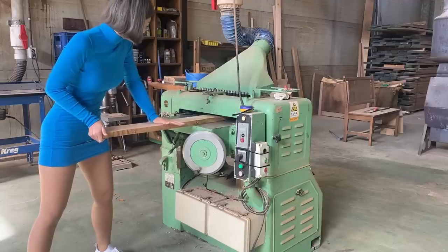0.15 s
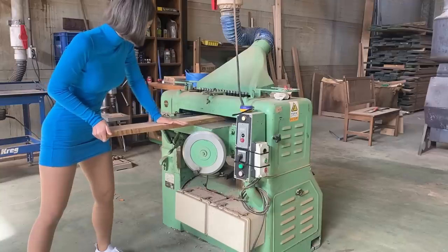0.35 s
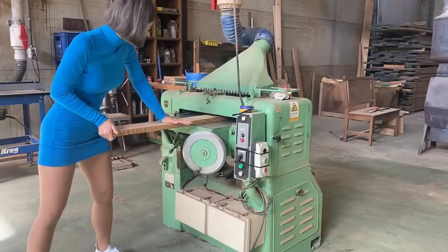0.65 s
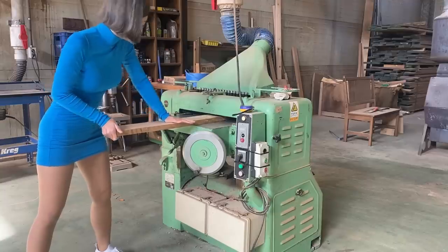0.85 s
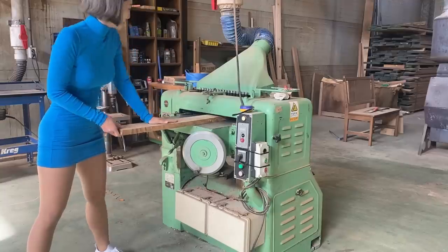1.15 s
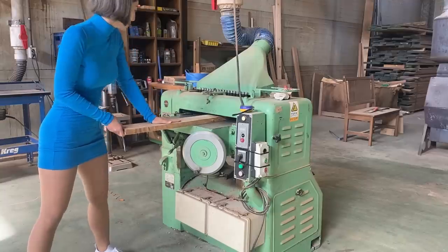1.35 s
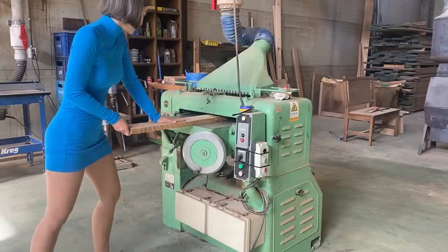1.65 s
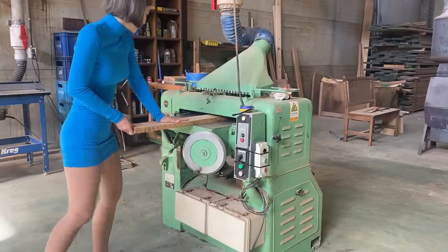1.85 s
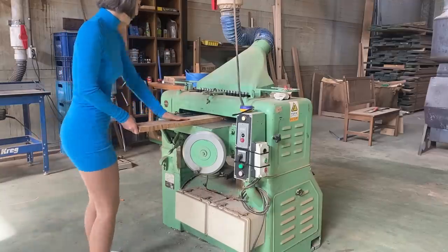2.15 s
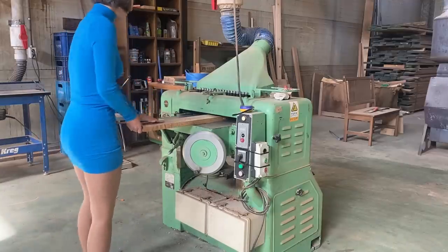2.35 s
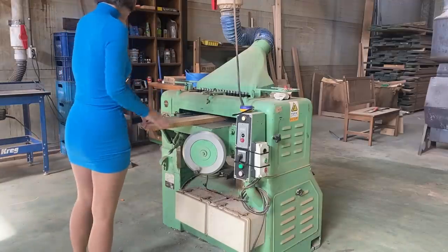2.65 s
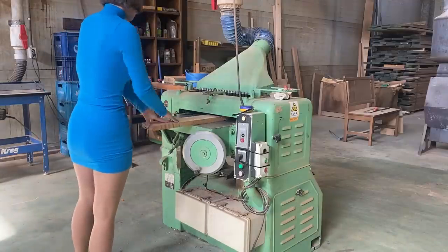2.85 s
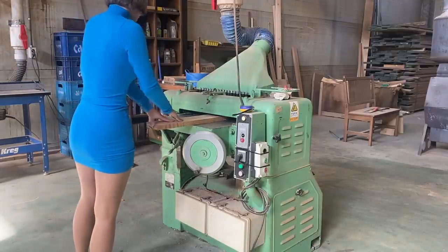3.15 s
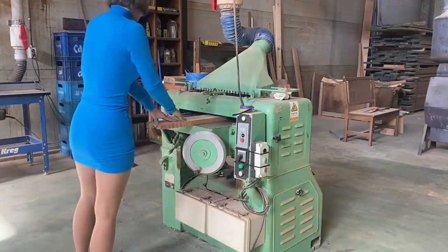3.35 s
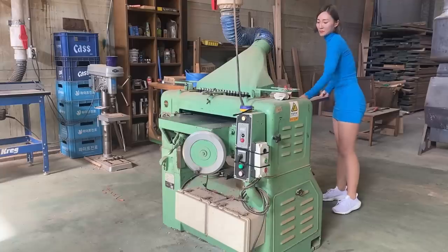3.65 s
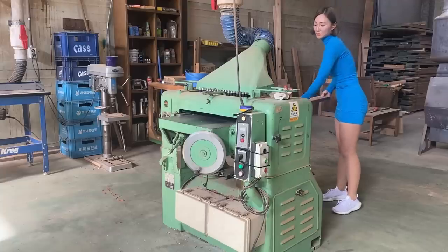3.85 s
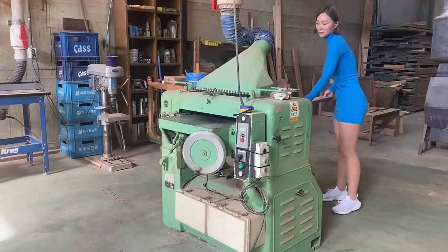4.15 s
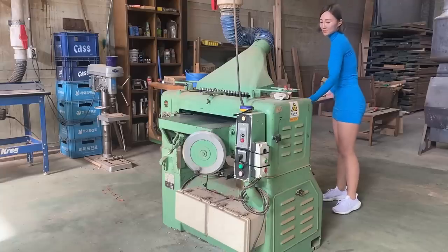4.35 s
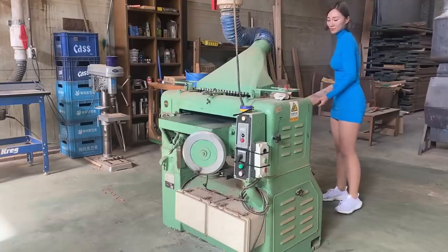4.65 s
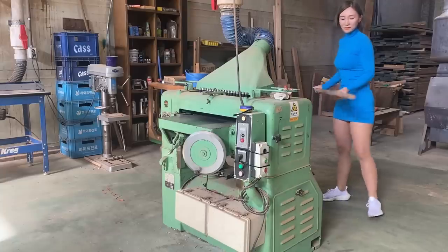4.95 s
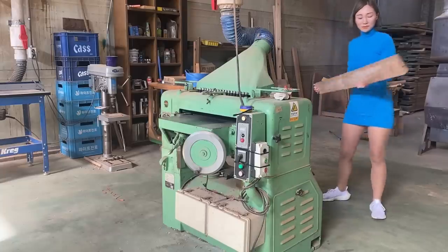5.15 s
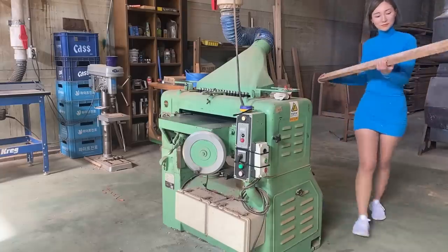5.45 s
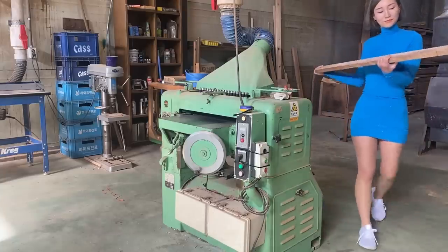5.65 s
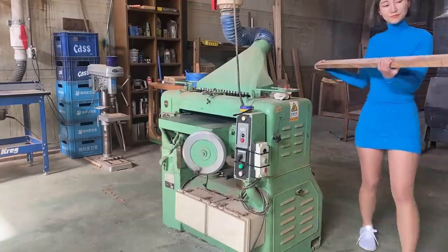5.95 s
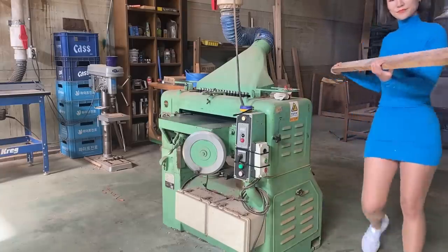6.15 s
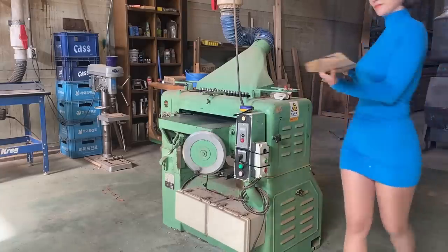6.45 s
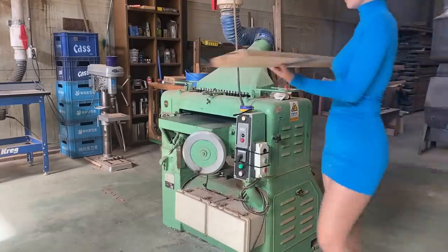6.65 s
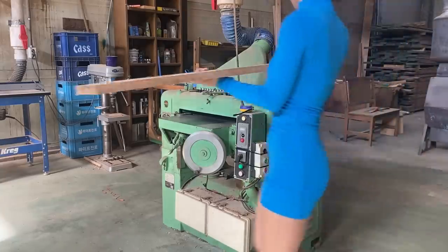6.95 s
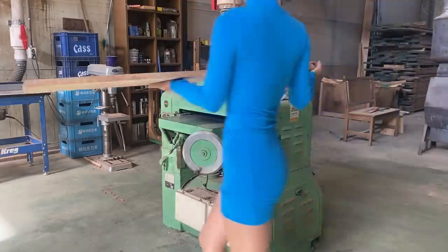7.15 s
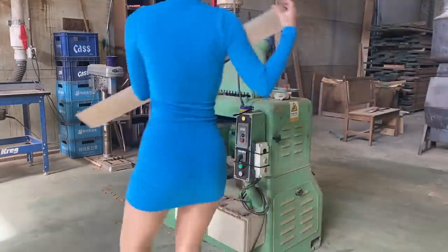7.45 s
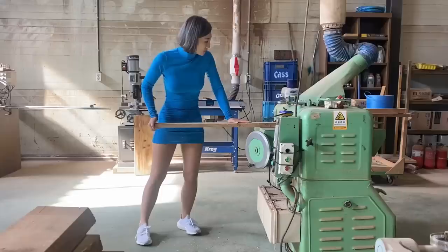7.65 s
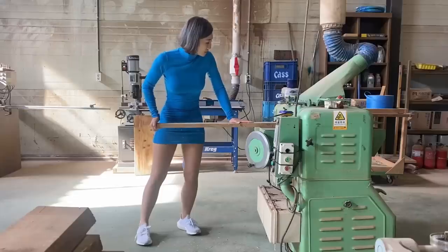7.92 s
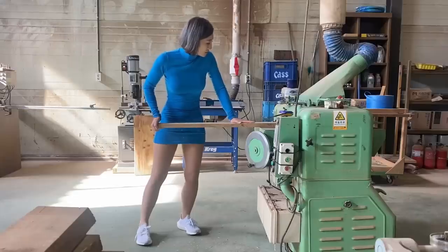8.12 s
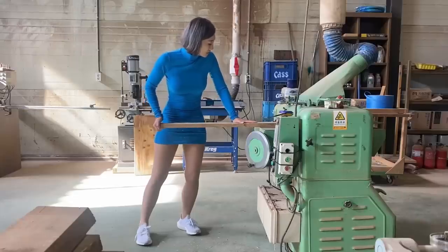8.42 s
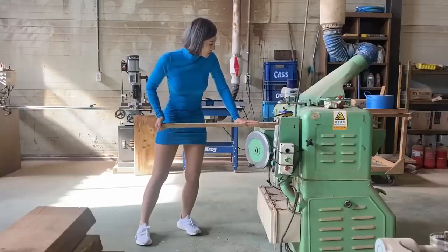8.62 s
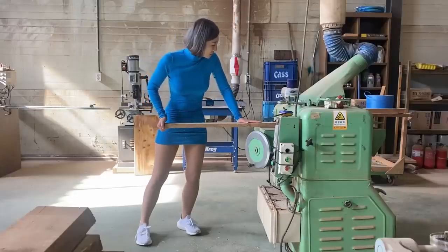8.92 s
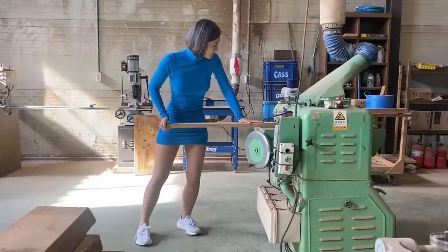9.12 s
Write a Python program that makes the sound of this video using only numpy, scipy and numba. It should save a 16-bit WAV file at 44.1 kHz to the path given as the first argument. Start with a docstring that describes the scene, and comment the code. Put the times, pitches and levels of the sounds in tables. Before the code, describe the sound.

From the start, a large planer is already cutting a board: a loud, steady, buzzing howl built on a low shaft pitch near 136 Hz, with a strong nasal whine and sizzling torn chips. Individual ringing tones swell and fade as the board slides, with rougher bursts around 0.1, 1 and 2.5 seconds; near 3 seconds the whine jumps louder and more piercing. At 3.4 it stops abruptly, leaving a far quieter idle: low hum, mid-low blower drone with slight beating, and dull rushing air. A faint wooden tick comes near 4.1, light shoe scuffs near 5.7, 5.9 and 7.4, while the drone gradually rises. At 7.6 a second pass bursts in, raspier, with more buzz and hiss, dipping around 8.3 to 8.5, then growing louder and more ringing until it ends mid-cut near 9.3. Stereo microphone, moderate distance, workshop.

```python
"""Thickness planer in a workshop

Three stretches follow abruptly: a board being planed, the machine idling with shoes scuffing, a second board pass.
Four uneven knives on a cutter shaft strike the ringing board, summed as multiples of the shaft rate.
Torn chips are noise in gusts once a turn; the empty cutter and a dust blower are steady tones, the blower's
just under the knife tone. Coloured noise gives the air roaring in the hood, the scuffs and a faint knock."""
import sys
import numpy as np
from scipy import signal
from scipy.fft import rfft, irfft
from scipy.io import wavfile
from scipy.ndimage import uniform_filter1d
from numba import njit

SR = 44100
rng = np.random.default_rng(int(sys.argv[2]) if len(sys.argv) > 2 else 0)


def volts_from_decibels(level):
    """Turn decibel levels (scalar or array-like) into linear amplitude factors."""
    exponent = np.asarray(level, float) / 20
    return 10 ** exponent


def log_audio(samples):
    """Write samples as a 16-bit WAV file to the path given in sys.argv[1]."""
    # one column per channel
    frames = np.atleast_2d(samples).T
    # limit to full scale, then quantise
    limited = np.clip(frames, -1, 1)
    pcm = np.round(limited * 32767).astype(np.int16)
    wavfile.write(sys.argv[1], SR, pcm)


N = 409248
HOP = 256  # samples per control step
T = np.arange(N // HOP + 2) * HOP / SR  # control times in seconds
ORDERS_N = 115  # multiples of the shaft rate
IDLE_HZ = 137.68  # shaft rate without a board
IDLE_HUM_DB = -62  # hum setting at which the empty cutter and the board's lowest multiples are not shifted

# The cut, one list for each pass of a board. Each row: time in seconds, shaft rate in Hz, whine (0.9-3.1 kHz) in dB,
# then in dB against the whine: buzz (3.1-6 kHz) and sizzle (over 6 kHz).
CUTS = [
    [(0.0, 136, -44.5, -6.5, -13), (0.17, 136.1, -42.5, -9, -18.5), (0.4, 136.2, -44, -7.5, -16),
     (0.56, 136, -40.5, -11.5, -18.5), (0.68, 136.1, -44.5, -10.5, -15), (0.94, 135.9, -41.5, -12, -18),
     (1.04, 136, -41, -8.5, -18), (1.12, 136, -45, -8.5, -16.5), (1.21, 136.1, -41, -10.5, -16.5),
     (1.34, 136.3, -45, -10.5, -17), (1.91, 135.9, -43.5, -13, -17), (2.74, 136.0, -45, -6.5, -15.5),
     (2.99, 135.9, -36, -11.5, -22.5), (3.08, 135.5, -37, -13, -22.5), (3.42, 135.5, -38, -13, -22)],
    [(7.621, 137.1, -53, -5, -11), (7.628, 136.4, -39, -3, -7.5), (7.794, 136.3, -38, -3.5, -10.5),
     (7.95, 136.2, -45, -3.5, -11), (8.098, 136.2, -42, -8.5, -11.5), (8.328, 136.1, -45, 1, -4.5),
     (8.374, 136.3, -44, -3, -11), (8.494, 136.3, -47, -1, -8), (8.656, 136.1, -41, -5.5, -12),
     (8.956, 136, -41, -6, -15.5), (9.132, 136.4, -39, -7, -18.5), (9.28, 135.9, -37.5, -7, -16)],
]
# Tones of the empty cutter. Each row: multiple of the shaft rate (its fraction is dropped), level in dB,
# left minus right in dB, lead of the left channel in radians.
EMPTY_TONES = [(1, -63.5, -0.5, -0.23), (2, -81, -8, 0.3), (3.0015, -71.5, 0, 0.2), (4.001, -63, 4.5, 0.1),
               (5.005, -74, -0.5, 0.4), (6, -79.5, -3, 1.7), (8.001, -66, 0.5, 0.96),
               (11.997, -77.5, -5.5, -0.4), (16.007, -75.5, 3, -0.2), (23.98, -87.5, 1.5, 0.2)]
# Centres of the four bands of chip hiss, in Hz.
CHIP_BANDS_HZ = [1200, 2800, 5000, 9000]
SECOND_PASS_S = CUTS[1][0][0]
EARLY = T < SECOND_PASS_S - 1  # first-pass settings hold until the idling is nearly over


def along(points, hz):
    """Read a (Hz, value) table on a log-frequency axis."""
    f, v = np.transpose(points)
    return np.interp(np.log(np.maximum(hz, 1)), np.log(f), v)


def full(curve):
    """Control rate to sample rate."""
    return np.interp(np.arange(N) / SR, T, curve)


def walks(rate, count):
    """Smooth random walks at control rate, spread 1; a higher rate (Hz) moves faster."""
    k = max(int(SR / HOP / rate), 1)
    w = uniform_filter1d(rng.standard_normal((count, len(T))), k)
    w = uniform_filter1d(w, k)
    return w / w.std()


def diffuse(points):
    """Coloured stereo noise, its mid at rms 1: alike left and right in the bass, opposed in the top treble."""
    # Each row: frequency in Hz, side minus mid in dB.
    side_points = [(60, -31), (110, -21), (200, -16), (380, -6), (700, -1), (1290, 6.5), (2380, -2),
                   (4400, -1), (8120, 0.5), (15000, 5)]
    hz = np.fft.rfftfreq(N, 1 / SR)
    mid, side = rfft(rng.standard_normal((2, N))) * volts_from_decibels(along(points, hz))
    side = side * volts_from_decibels(along(side_points, hz))
    mid, side = irfft(mid, N), irfft(side, N)
    return np.array([mid + side, mid - side]) / mid.std()


def stitch(tables, rest):
    """Columns of several stretches on one time line; rest between them."""
    out = np.full((len(tables[0][0]) - 1, len(T)), float(rest))
    for rows in tables:
        s, *columns = np.transpose(rows)
        inside = (T >= s[0]) & (T <= s[-1] + .004)
        out[:, inside] = [np.interp(T[inside], s, c) for c in columns]
    return out


def pair(db, pan_db, lead):
    """Complex peak sizes left and right of a tone of rms db."""
    left = volts_from_decibels(db + pan_db / 2) * np.exp(.5j * lead)
    right = volts_from_decibels(db - pan_db / 2) * np.exp(-.5j * lead)
    return np.sqrt(2) * np.array([left, right])


def ports(hz):
    """How two microphone ports hear the cutter: left lead (rad), balance (dB), share scattered by the hall."""
    # Each row: frequency in Hz, lead of the left port in radians, left minus right in dB.
    port_points = [(2400, 0.29, 2), (3520, 1.19, 2.5), (7500, 1.35, 5), (8600, 0.9, 3.5), (10550, -1., 1.5),
                   (12470, -3, 0), (13400, -3, 0), (14400, -5, 0), (15600, -6.5, 0)]
    f, lead, pan_db = np.transpose(port_points)
    scattered = np.exp(-(hz / 11100) ** 8)  # above 11.1 kHz the sound comes straight from the cutter
    return np.interp(hz, f, lead), np.interp(hz, f, pan_db), scattered


@njit
def sum_multiples(phase, size, heard, hop):
    """Sum the heard multiples of a shaft phase, each with a slowly moving complex size for both channels."""
    out = np.zeros((2, len(phase)))
    for i in range(len(phase)):
        b, u = i // hop, (i % hop) / hop
        z = np.exp(1j * phase[i])
        zk, left, right = z, 0., 0.
        for k in range(heard[b]):
            left += (zk * (size[0, b, k] + u * (size[0, b + 1, k] - size[0, b, k]))).real
            right += (zk * (size[1, b, k] + u * (size[1, b + 1, k] - size[1, b, k]))).real
            zk *= z
        out[0, i], out[1, i] = left, right
    return out


def board(bands_db, hum_db, cutting):
    """Uneven knives strike the ringing board: complex size of every shaft multiple, fading as the board slides."""
    # Ring of the board. Each row: multiple of the shaft rate, then for each pass a level in dB and left minus right
    # in dB. From the 7th multiple up the levels only balance the multiples within a band; the 1st is lowered below.
    ring_rows = [(2, -68.5, 1, -71.5, 1.5), (3, -64, 2.5, -64.5, 1.5), (4, -55.5, 1, -61.5, 0.5),
                 (5, -70.5, 1, -63, 2), (6, -71, 1, -76.5, 3), (7, -75.5, 3, -65, 0),
                 (8, -57.5, -1.5, -56, 2), (9, -63, -0.5, -57.5, -4), (10, -65, 0.5, -62, 9.5),
                 (11, -64.5, 4, -62.5, 2), (12, -49, 2, -54, 5.5), (13, -50, -1, -63, 7),
                 (14, -74.5, -4, -59.5, -5), (15, -65.5, 3, -59, -6), (16, -53, 1, -57.5, -4),
                 (17, -56.5, 3.5, -51, 1), (18, -64, 0, -59, 4), (19, -62.5, 3, -61, 7.5),
                 (20, -68, 6, -57.5, -1), (21, -57.5, 0, -60, -2), (22, -65, 1, -58, 1),
                 (23, -67.5, 1, -61, 5), (24, -63, 1, -57, 1), (25, -60.5, 2, -62, 1),
                 (26, -62.5, 1, -59, 1), (27, -69, 1, -59.5, 0.5), (28, -68.5, -1, -59, 3),
                 (29, -63.5, 2, -61, 2), (30, -66.5, 2, -69, 1), (31, -64.5, 0, -65.5, 1),
                 (32, -62, 1, -60, 1), (33, -63, 1, -60.5, 1)]
    # Ring above those multiples. Each row: frequency in Hz, level in dB against the last six of them.
    ring_top = [(3800, 3), (4500, -2.5), (6000, -6.5), (8000, -12), (10500, -19), (12500, -17.5),
                (14500, -19), (15500, -25)]
    # Relative depth of bite of each knife.
    knife_depths = [1, 0.81, 0.31, 0.39]
    # As the free end of the board shortens, resonances sing out or fall away. Each row: start and end in seconds,
    # centre in Hz, width in Hz, gain in dB before band balancing (part or none if the end precedes the start).
    singing = [(0, 1.05, 2180, 71, 5), (0, .45, 3300, 74, 7), (.6, 1.78, 1630, 58, 3),
               (-0.5, .75, 2680, 91, 9.5), (0.3, 2.07, 1360, 44, 8), (2.5, 3.2, 1900, 44, 9.5),
               (3, 3., 2860, 50, 6.5), (.9, 1.05, 1500, 43, 10.5), (1.1, 1.074, 3200, 430, 6.5),
               (1.2, 1.31, 1500, 50, 9), (1.3, 1.84, 2000, 72, -9), (1.6, 2.4, 3300, 140, -5),
               (1.6, 2.35, 2860, 69, 4), (2., 3.42, 747, 84, 10), (2, 3.42, 1220, 69, 9),
               (2, 2.75, 2700, 63, 8), (2.5, 2.8, 1770, 50, -4), (2.58, 2.82, 2180, 60, -10),
               (2.5, 2.7, 3520, 80, 4.5), (3, 3., 3400, 51, 9), (3, 3.33, 1500, 65, 9.5),
               (2.8, 3.42, 2040, 50, 11.5), (3.5, 3.08, 2310, 67, 4.5), (3, 3.42, 950, 53, 13.5),
               (3, 3.354, 2180, 60, 9), (3, 3.42, 1090, 43, 4.5), (3, 3.27, 2310, 50, -10),
               (2.97, 3.42, 2680, 90, 19), (3, 3.42, 3130, 50, 8), (7.62, 7.76, 2900, 95, 13.5),
               (7.62, 7.92, 1690, 80, 8), (7.62, 8.02, 3730, 150, 7.5), (8, 7.88, 2310, 60, 6),
               (7.5, 7.9, 3270, 60, 5.5), (8., 8.55, 950, 46, 8), (8.55, 9., 1415, 80, 8.5),
               (8., 8.32, 1900, 50, 6.5), (8.5, 8.36, 3700, 80, 9.5), (8.2, 8.5, 4490, 60, 5),
               (7.95, 8.35, 2580, 50, 7), (8.64, 9.28, 2180, 60, 15.5), (9, 9.28, 2310, 45, 6),
               (8.8, 9.28, 3270, 60, 5), (9.21, 9.28, 2860, 70, 13), (9, 9.28, 680, 46, 7.5),
               (9.15, 9.28, 1630, 60, 4.5)]
    # How far walls and casting scatter the phases, in radians, for each pass.
    scatter_rad = [1.17, 2.21]
    scatter_db, swell_db, sing_ramp_s = 2., 3., 0.077
    moving_db, apart, lead_spread = -6., 1.94, 0.79  # restless share, its left-right difference, lead in radians

    k = np.arange(1, ORDERS_N + 1)
    hz = k * IDLE_HZ
    port_lead, port_pan_db, diffuse_share = ports(hz)
    ring = np.transpose(ring_rows)
    db, pan_db, lead = np.zeros((3, len(T), ORDERS_N))

    # the knives come a quarter turn apart; the scattered phases creep as the board moves
    bites = sum(a * np.exp(-.5j * np.pi * k * j) for j, a in enumerate(knife_depths))
    phase = np.angle(bites) + np.where(EARLY, *scatter_rad)[:, None] * walks(.6, count=ORDERS_N).T

    for rows, low_db, pans in zip(CUTS, ring[1::2], ring[2::2]):
        shape = low_db[-6:].mean() + along(ring_top, hz) + scatter_db * rng.standard_normal(ORDERS_N)
        pan = port_pan_db + 2.2 * diffuse_share * rng.standard_normal(ORDERS_N)
        shape[1:len(low_db) + 1], pan[1:len(low_db) + 1] = low_db, pans
        shape[0] = low_db[0] - 30
        now = T >= rows[0][0] - .01
        db[now], pan_db[now] = shape, pan
        spread = lead_spread * diffuse_share * np.minimum(hz / 790.0, 1)
        lead[now] = port_lead + spread * rng.standard_normal(ORDERS_N)

    shaft_hz = CUTS[0][0][1]
    for start, end, mode_hz, width_hz, mode_db in singing:
        on = np.clip(np.minimum(T - start, end - T) / sing_ramp_s + 1, 0, 1)
        db += mode_db * np.outer(on, np.exp(-.5 * ((k * shaft_hz - mode_hz) / width_hz) ** 2))
    # upper multiples swell one by one
    db += swell_db * np.clip(hz / 2970.0 - .6, 0, 1) * walks(2.8, count=ORDERS_N).T
    # the lowest multiples shake the casting like the hum
    db[:, :6] += (hum_db - IDLE_HUM_DB)[:, None]
    # whine, buzz and sizzle bands are brought to their levels
    for (lo, hi), band_db in zip([(6, 23), (23, 44), (44, ORDERS_N)], bands_db):
        sum_db = 10 * np.log10((volts_from_decibels(db[:, lo:hi]) ** 2).sum(axis=1))
        db[:, lo:hi] += (band_db - sum_db)[:, None]

    # the sliding board shifts its nodes: a restless share, quicker in the treble, makes each multiple fade and turn
    slow, quick = (walks(rate, count=6 * ORDERS_N).reshape(3, 2, ORDERS_N, -1) for rate in (9., 24.))
    mix = np.clip(hz / 6700.0, 0, .9)[:, None]
    w = np.sqrt(1 - mix) * slow + np.sqrt(mix) * quick
    # neighbours move partly together, so the restless share still arrives as a rattle once a turn
    w = uniform_filter1d(w, size=3, axis=2) * np.sqrt(3)
    w = (w[:, 0] + 1j * w[:, 1]).transpose(0, 2, 1) * np.exp(1j * np.angle(bites)) / np.sqrt(2)
    own = apart * diffuse_share * np.minimum(hz / 3430.0, 1)
    # strong multiples are steadier than their weak neighbours
    restless_db = 0.72 * (uniform_filter1d(db, size=7, axis=1) - db) + moving_db
    share = volts_from_decibels(restless_db) * np.minimum(hz / 1130.0, 1)
    fade = (np.exp(1j * phase) + share * (w[0] + own * w[1:])) / np.sqrt(1 + share ** 2)
    return pair(db, pan_db, lead) * fade * cutting[:, None]


def chips(bands_db, phase):
    """Shavings torn off and flung up the hood, in gusts once a turn; four bands of hiss come in patches."""
    # Colour of the hiss. Each row: frequency in Hz, density in dB per Hz.
    chip_colour = [(150, -50), (500, -19), (900, -4.5), (1400, -6.5), (2200, -4), (3400, -5.5),
                   (6000, -10.5), (10000, -19.5), (13000, -20), (16000, -27)]
    # Tearing in each pass, one gain in dB for each band: two against the whine, then buzz, then sizzle.
    tear_rows = [(-23, -21, -13, -3.5), (-17.5, -10.5, -6.5, 1)]
    # Rough bursts where the grain splits. Each row: middle in seconds, half length in seconds,
    # dB over the steady tearing, centre in Hz.
    grain_splits = [(.12, .06, 7, 2800), (.55, .06, 1, 2200), (1.04, .085, 6, 3300), (1.25, .06, 2, 1802),
                    (2.45, .1, 4, 2500), (3.0, 0.13, 6, 1700), (7.72, .14, 1.5, 2201)]
    gate, patchy_db, hall_db, reach_octaves = 0.82, 2., -3.0, 1.3

    hz = np.fft.rfftfreq(N, 1 / SR)
    near = rfft(rng.standard_normal(N)) * volts_from_decibels(along(chip_colour, hz))
    lead, pan_db, scattered = ports(hz)
    near = near * pair(0, pan_db, lead) / np.sqrt(2) / irfft(near, N).std()
    hiss = near + volts_from_decibels(hall_db) * scattered * rfft(diffuse(chip_colour))

    split_db = 0
    for s, half, db, mid_hz in grain_splits:
        reach = np.exp(-(np.log2(np.divide(CHIP_BANDS_HZ, mid_hz)) / reach_octaves) ** 2)
        split_db = split_db + db * np.outer(reach, np.exp(-((T - s) / half) ** 4))
    tear_db = np.where(EARLY, *np.array(tear_rows)[:, :, None])
    levels_db = bands_db[[0, 0, 1, 2]] + tear_db + split_db

    out = np.zeros((2, N))
    for band, db, patch in zip(np.eye(len(CHIP_BANDS_HZ)), levels_db, walks(11.0, count=4)):
        weight = along(list(zip(CHIP_BANDS_HZ, band)), hz)
        out += irfft(hiss * weight, N) * full(volts_from_decibels(db + patchy_db * patch))
    return out * (1 + gate * np.cos(phase))


def empty_cutter(hum_db, cutting):
    """Shaft hum always; the knives' wind tones, fluttering a little, while no board is in."""
    size = np.zeros((2, len(T), ORDERS_N), complex)
    for (k, db, pan_db, lead), w in zip(EMPTY_TONES, walks(6., count=len(EMPTY_TONES))):
        heard = 1 if k == 1 else 1 - cutting
        flutter_db = 0.8 * w * (k > 1)
        size[:, :, int(k) - 1] = pair(hum_db - IDLE_HUM_DB + db + flutter_db, pan_db, lead) * heard
    return size


def blower(db):
    """Blade tone of the dust blower and its octave, drifting in phase and level; they beat with the knife tone."""
    # Each row: frequency in Hz, level in dB against the blade tone, left minus right in dB, left lead in radians.
    blower_tones = [(523.9, 0, 6, 0), (1047.8, -18, 5, .9)]
    t = np.arange(N) / SR
    drift = full(0.11 * walks(2., count=1)[0])  # radians
    out = np.zeros((2, N))
    for hz, tone_db, pan_db, lead in blower_tones:
        level_db = full(db + tone_db + 0.57 * walks(8., count=1)[0])
        phase = 2 * np.pi * hz * t + drift * hz / blower_tones[0][0]
        out += (pair(level_db, pan_db, lead) * np.exp(1j * phase)).real
    return out


def scuffs():
    """Shoes scuff the floor: short bright rubs of noise, a 25 ms slide, then the hall's tail."""
    # Each row: start in seconds, level in dB, 60 dB decay time in seconds.
    scuff_rows = [(5.676, -68.5, .15), (5.9, -80, .1), (7.36, -77.5, .2)]
    t = np.arange(N) / SR
    shape = np.zeros(N)
    for s, db, t60 in scuff_rows:
        shape += volts_from_decibels(db) * (t > s) * 1000. ** (-np.maximum(t - s - .025, 0) / t60)
    return shape * diffuse([(1500, -22), (3000, -5), (9000, -7), (13000, -16), (16000, -15)])


def knock():
    """A faint, dull wooden tick: noise around 2.4 kHz that starts to die at once."""
    # One row: start in seconds, level in dB, 60 dB decay time in seconds.
    knock_row = (4.084, -67.5, .07)
    s, db, t60 = knock_row
    t = np.arange(N) / SR
    shape = volts_from_decibels(db) * (t > s) * 1000. ** (-np.maximum(t - s, 0) / t60)
    return shape * diffuse([(1000, -20), (2400, 2), (4000, -3), (7500, -12), (11000, -30)])


def hood_air(db):
    """Air roaring in the hood: diffuse coloured noise whose level wanders slightly."""
    # Each row: frequency in Hz, density in dB per Hz.
    air_colour = [(24, -82), (45, -42), (65, -24), (105, -13), (160, -17), (310, -15.5), (467, -16.5),
                  (529, -9), (615, -13), (770, -19), (1090, -18), (1300, -24), (2200, -27), (16000, -50.5)]
    return diffuse(air_colour) * full(volts_from_decibels(db + .5 * walks(3., count=1)[0]))


def scene():
    """Board and cutter on one shaft phase, with chips, blower, air, scuffs and knock."""
    # The running machine, one list for each stretch. Each row: time in seconds, shaft hum setting in dB,
    # blower tone in dB, air in dB.
    machine_rows = [
        [(0, -66, -61, -66.5), (2.8, -66, -61, -66.5), (3.42, -68, -64, -70.5)],
        [(3.42, -63.5, -60, -65), (4.5, -63, -59.5, -64.5), (5.5, -61, -56.5, -62.5), (6.5, -59, -56, -61.5),
         (7.62, -59.5, -52.5, -59)],
        [(7.62, -52.5, -62, -51), (7.8, -55, -60, -58), (8.1, -56, -64, -58), (8.7, -58, -71, -58),
         (9.28, -58.5, -73, -57.5)],
    ]
    hz, whine_db, buzz_db, sizzle_db = stitch(CUTS, np.nan)
    cutting = 1. - np.isnan(hz)
    phase = 2 * np.pi * np.cumsum(full(np.nan_to_num(hz, nan=IDLE_HZ))) / SR
    bands_db = np.nan_to_num([whine_db, whine_db + buzz_db, whine_db + sizzle_db], nan=-200)
    hum_db, blower_db, air_db = stitch(machine_rows, -60)
    size = board(bands_db, hum_db, cutting) + empty_cutter(hum_db, cutting)
    # the idle stretch needs only the lowest multiples
    heard = np.where(uniform_filter1d(cutting, size=3) > 0, ORDERS_N, int(EMPTY_TONES[-1][0]))
    shaft = sum_multiples(phase, size, heard, HOP)
    return shaft + chips(bands_db, phase) + blower(blower_db) + scuffs() + knock() + hood_air(air_db)


def roll_off(x):
    """The treble ends steeply here."""
    return signal.sosfilt(signal.butter(12, 16320, fs=SR, output="sos"), x)


def record(dry):
    """The microphone's top is cut steeply above 15.7 kHz."""
    top = signal.ellip(10, .2, 60, 15700, fs=SR, output="sos")
    mix = signal.sosfilt(top, dry)
    return roll_off(mix)


dry = scene()
out = record(dry)
log_audio(out)
```